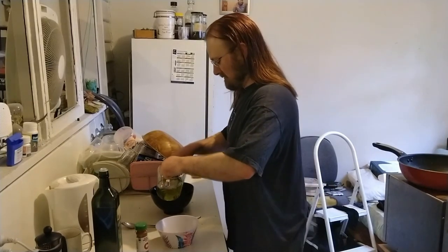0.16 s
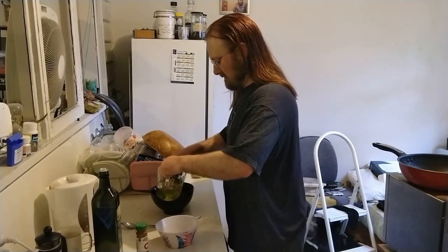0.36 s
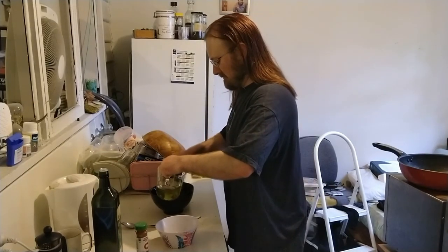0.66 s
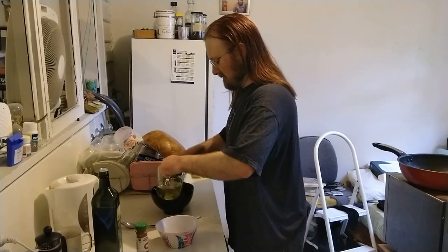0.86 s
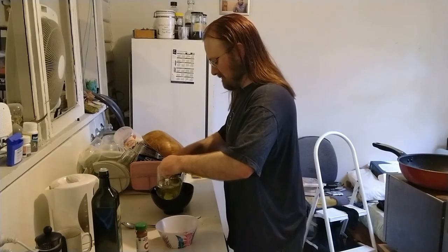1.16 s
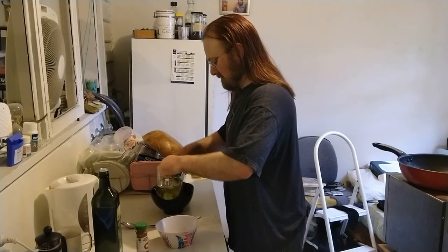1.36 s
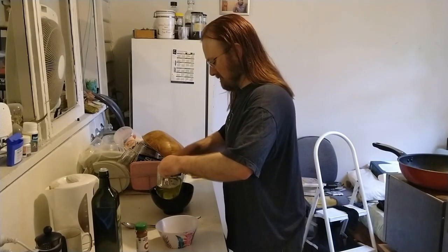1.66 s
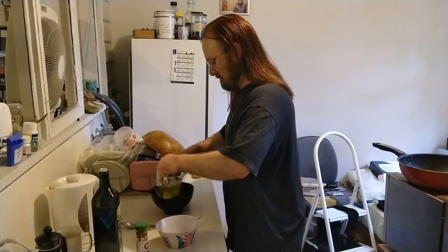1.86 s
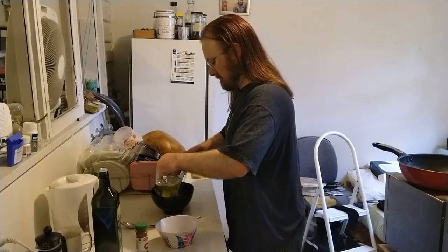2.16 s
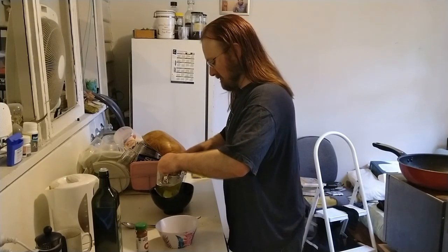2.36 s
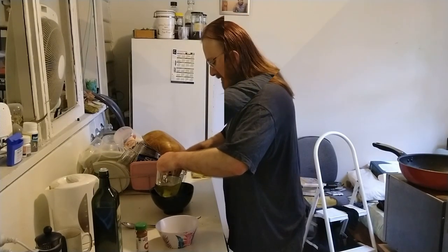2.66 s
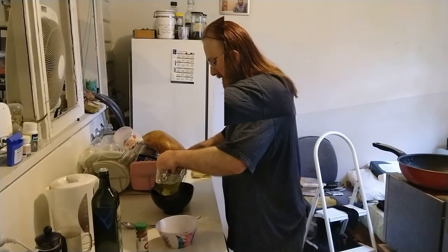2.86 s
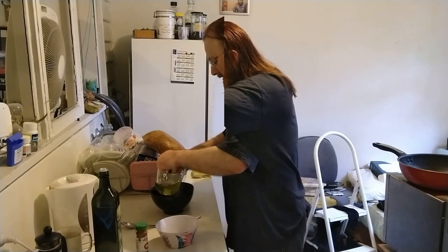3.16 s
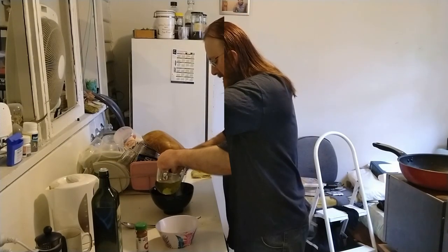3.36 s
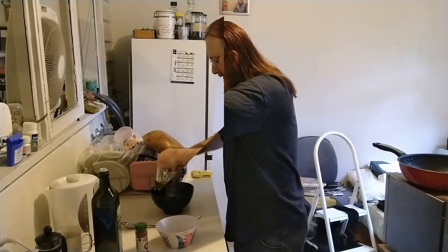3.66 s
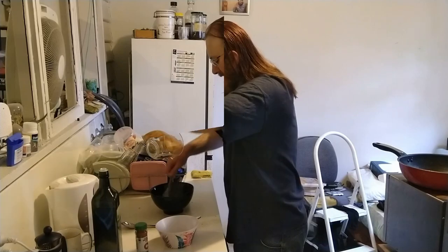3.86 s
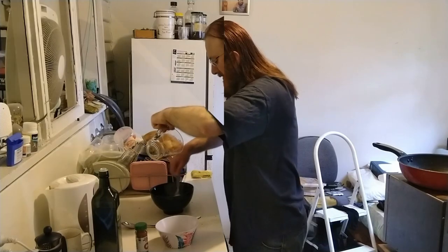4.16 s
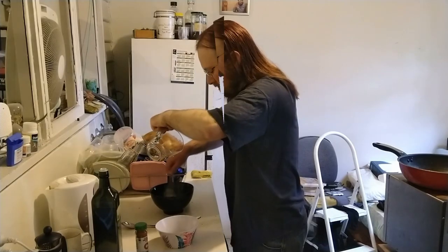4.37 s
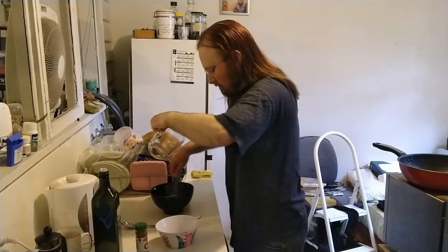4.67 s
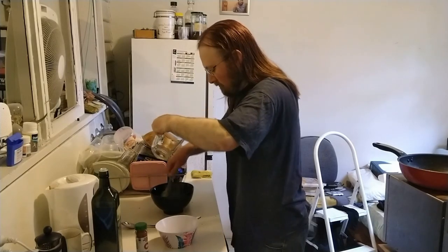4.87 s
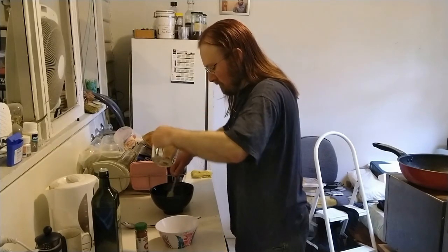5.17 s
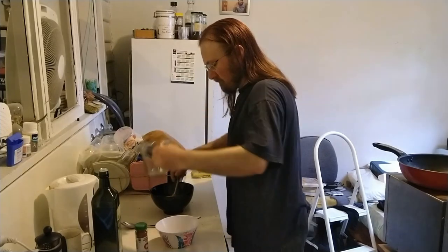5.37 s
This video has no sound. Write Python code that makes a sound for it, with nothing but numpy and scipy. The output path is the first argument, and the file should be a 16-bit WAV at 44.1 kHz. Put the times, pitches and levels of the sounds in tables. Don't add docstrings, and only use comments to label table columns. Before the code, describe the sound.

Metal utensil beats food in a glass jug, about six bright clattering knocks a second with counter thumps, slower after a cut, over engine hum.

```python
import sys
import numpy as np
from scipy import signal
from scipy.io import wavfile
from scipy.ndimage import uniform_filter1d

SR = 44100
rng = np.random.default_rng(int(sys.argv[2]) if len(sys.argv) > 2 else 0)


def wav_record(signal):
    frames = np.transpose(np.atleast_2d(signal))
    bounded = np.clip(frames, -1, 1)
    quanta = np.round(bounded * 32767).astype(np.int16)
    wavfile.write(sys.argv[1], SR, quanta)


def undo_db(level):
    steps = np.asarray(level, float) / 20
    return 10 ** steps


N = 243431
SCENE_CHANGE_S = 3.4436
GRIP_UNTIL_S, GRIP_RING_DB, GRIP_COUNTER_DB = 0.93, -49, -7


def evened(x):
    return x / np.sqrt(np.mean(x ** 2) + 1e-20)


def read(points, hz):
    f, value = np.transpose(points)
    return np.interp(np.log(hz + 1), np.log(f + 1), value)


def add(mix, s, sound):
    part = mix[round(s * SR):][:len(sound)]
    part += sound[:len(part)]


def gritty(size):
    spikes_db = 5. * np.minimum(rng.exponential(1, size), 4)
    return evened(rng.standard_normal(size) * undo_db(spikes_db))


# [freq_hz, likeness]
LIKENESS = [(200, 0.53), (400, 0.98), (600, 0.022), (6000, 0.033), (9000, 0.2)]


def noise(colour, size, patchy_db):
    hop, hz = size // 4, np.fft.rfftfreq(size, 1 / SR)
    a, b, c, d, patches = rng.standard_normal((N // hop + 5, len(hz), 5)).T
    patches = uniform_filter1d(patches, size=12, axis=0)
    patches = evened(uniform_filter1d(patches, size=10, axis=1, mode="wrap"))
    same = np.clip(read(LIKENESS, hz), -1, 1)[:, None]
    left = a + 1j * b
    right = same * left + np.sqrt(1 - same ** 2) * (c + 1j * d)
    z = np.array([left, right]) * undo_db(read(colour, hz)[:, None] + patchy_db * patches)
    return evened(signal.istft(z, nperseg=size, noverlap=size - hop)[1][:, :N])


def beating():
    linger_s, after_change_db = 0.13, -2
    s, _, db, _ = np.transpose(KNOCKS)
    at = np.arange(0, N, 256)
    since = at / SR - s[:, None]
    power = undo_db(db + after_change_db * (s > SCENE_CHANGE_S))[:, None] ** 2
    power = power * np.exp(-(since / linger_s) ** 2) * (since > 0)
    strength = np.sqrt(uniform_filter1d(power.sum(0), size=12) / 2)
    return np.interp(np.arange(N), at, strength)


# [freq_hz, level_db]
AIR_COLOUR = [(120, -44), (200, -9.5), (430, -8), (1100, -8.5), (1730, -16), (2400, -17.5), (3500, -20),
              (6000, -25), (7800, -31), (9300, -63), (11000, -38), (14500, -44), (16500, -68)]


def air():
    return undo_db(-58.5) * noise(AIR_COLOUR, size=1024, patchy_db=3.5)


# [freq_hz, level_db]
WASH_COLOUR = [(250, -19), (400, 3), (600, -3.5), (900, -9.5), (1500, -7), (2200, -53)]


def wash():
    quiet_db, of_thump_db = -59, -23
    passing_s, passing_half_s, passing_db = 2.74, 0.23, -51
    passing = undo_db(passing_db) * np.exp(-((np.arange(N) / SR - passing_s) / passing_half_s) ** 2)
    swell = undo_db(-8.5) * (undo_db(quiet_db) + undo_db(of_thump_db) * beating() + passing)
    return swell * noise(WASH_COLOUR, size=512, patchy_db=4.5)


# [freq_hz, level_db]
MURMUR_COLOUR = [(60, -10), (100, 11), (150, 2.5), (220, 1), (330, -15), (500, -36.5)]


def murmur():
    quiet_db, of_thump_db = -55, -17.5
    level = undo_db(quiet_db) + undo_db(of_thump_db) * beating()
    return level * noise(MURMUR_COLOUR, size=2048, patchy_db=5.5)[0]


# [loudest_s, half_length_s, pitch_hz, level_db]
DRONE = [(0.03, .12, 52, -52), (1.644, 0.12, 50, -50), (2.504, .1, 50, -45), (3.306, .07, 52, -40),
         (3.586, 0.15, 45, -33.5), (3.876, 0.38, 44.5, -37.5), (4.607, 0.35, 46, -42.5),
         (5.084, 0.14, 46.5, -34.5), (5.396, 0.12, 50, -37), (4.06, 0.33, 69, -43),
         (4.252, 0.054, 68, -32.5), (4.44, 0.14, 68, -35.5), (4.72, 0.1, 69, -37), (5.236, 0.12, 63, -41),
         (5.428, 0.23, 137, -49.5)]
# [freq_hz, level_db]
RUMBLE_COLOUR = [(20, -29), (40, -3.5), (65, 5), (90, -10), (120, -49), (300, -76)]


def drone():
    waver_hz, rumble_db, rumble_of_drone_db = 0.8, -53.5, -11
    t = np.arange(N) / SR
    s, half, hz, db = np.transpose(DRONE)[:, :, None]
    swells = undo_db(db) * np.exp(-((t - s) / half) ** 2)
    rate, phase, start = rng.random((len(DRONE), 3)).T[:, :, None]
    per_s = 1 + 2 * rate
    waver = waver_hz / (2 * np.pi * per_s) * np.sin(2 * np.pi * (per_s * t + phase))
    turns = hz * t + waver + start
    notes = np.sqrt(2) * (swells * np.sin(2 * np.pi * turns)).sum(0)
    rumble = undo_db(rumble_db) + undo_db(rumble_of_drone_db) * np.linalg.norm(swells, axis=0)
    return notes + rumble * noise(RUMBLE_COLOUR, size=4096, patchy_db=-0.5)[0]


# [left_s, right_s, left_gain, right_gain]
ECHOES = [(0, .00004, .85, .9), (.001, .0009, .6, .45), (.002, .0023, .5, -.5), (.0033, .00335, 1.3, 1.35),
          (.0036, .0038, .3, -.6), (.0043, .0045, .8, .6), (.0105, .011, -.4, .35), (.0135, .013, .5, .45),
          (.02, .021, .35, -.35)]
# [freq_hz, t60_s], a negative time swells
TAIL_T60 = [(500, -2.5), (1600, 0.64), (2200, 0.31), (2800, 0.33), (4000, 0.23), (7000, 0.3),
            (12000, 0.2255)]
# [freq_hz, level_db]
TAIL_DB = [(1500, 0), (2100, -1), (2800, 6.5), (7000, 6), (12000, 3.5)]


def kitchen():
    taps = np.zeros((2, SR // 2))
    slots = np.arange(240, SR // 2 - 16, 16)
    at = slots + rng.integers(0, 16, (2, len(slots)))
    np.put_along_axis(taps, at, rng.choice([-1., 1.], at.shape), 1)
    taps[1] = .5 * taps[0] + .87 * taps[1]
    hz, t, z = signal.stft(taps, SR, nperseg=128)
    decay = undo_db(-60 * t / read(TAIL_T60, hz)[:, None])
    decay *= undo_db(read(TAIL_DB, hz)[:, None]) / np.linalg.norm(decay, axis=1, keepdims=True)
    tail = signal.istft(z * decay, SR, nperseg=128)[1] / 2
    for left_s, right_s, left, right in ECHOES:
        tail[[0, 1], [round(left_s * SR), round(right_s * SR)]] += left, right
    return tail


# [pitch_hz, level_db, t60_s, first_swing]
COUNTER = [(48.4, -21.9, 0.208, -1), (68.0, -32.0, 0.6, 1), (87.5, -22.7, 0.416, -1),
           (104.5, -6.9, 0.183, 1), (132.0, -6.4, 0.151, 1), (141.9, -2.0, 0.213, -1),
           (160.5, -4.7, 0.22, 1), (192.2, 0.0, 0.05, -1), (213.8, -4.3, 0.05, 1),
           (253.2, -20.6, 0.119, -1), (281.5, -26.6, 0.241, -1), (314.7, -15.4, 0.219, -1),
           (383.5, -29.0, 0.207, 1), (424.4, -45.2, 0.6, -1)]
# [pitch_hz, level_db, t60_s, first_swing]
SHELF = [(193, -31, 0.92, -0.92), (248.7, -20, 0.37, 0.64), (310, -27, 0.66, -0.2), (419, -25, 0.52, 0.5),
         (552, -43, 0.71, -1.24), (222.3, -52, 0.33, -0.86)]


def thump(db, upper_db):
    hz, mode_db, t60, direction = np.transpose(COUNTER + SHELF)[:, :, None]
    t = np.arange(12000) / SR
    detune, strength = rng.standard_normal((2, *hz.shape))
    level_db = mode_db + upper_db * (hz > 240) + 1.09 * strength - 60 * t / t60
    swing = np.sin(2 * np.pi * hz * (1 + 0.012 * detune) * t)
    return undo_db(db + 5.5) * (direction * undo_db(level_db) * swing).sum(0)


def touch(db, hz, rings):
    t = np.arange(1600) / SR
    wet, fine = rng.standard_normal((2, len(t) + 1))
    splash = 1.3 * uniform_filter1d(wet, size=20)[1:] * np.sin(2 * np.pi * hz * t)
    spray = 0.57 * np.diff(fine)
    slap = (splash + spray) * np.exp(-t / 0.019) * np.minimum(t / 0.0024, 1)
    ring = np.sin(2 * np.pi * hz * t * (1 + 4.3 * t))
    ring *= np.exp(-t / 0.0039) * np.minimum(t / 0.00051, 1)
    rings = np.clip(rings, 0, 1)
    return undo_db(db + 5) * (0.22 * (1 - rings) * slap + rings * ring)


# [start_s, level_db, pitch_hz, ringing_share]
TOUCHES = [(0.1226, -56, 1310, 0.1), (0.1505, -35.5, 2480, 0.26), (0.2423, -38.5, 1960, 0.18),
           (0.3494, -40.5, 3820, 0.3), (0.392, -35.5, 1460, 0.27), (0.418, -45.5, 3170, 0.57),
           (0.45, -40.5, 3410, 0), (0.5248, -32.5, 2910, 0.3), (0.712, -37, 3040, 0.72),
           (0.741, -31, 4660, 0.63), (0.7693, -26.5, 3830, 0.6), (0.8689, -39, 2835, 0.77),
           (0.893, -28.5, 4760, 0.2), (0.9262, -32.5, 3870, 0.67), (1.0885, -29.5, 4270, 0.54),
           (1.6098, -32, 2147, 0), (1.7488, -38.5, 2310, 0.44), (1.757, -40, 1480, 0.4),
           (2.83, -40, 1450, 0.4), (2.869, -44, 1450, .3), (3.029, -37, 1410, 0.5), (3.6894, -45, 1860, 1),
           (3.9967, -46, 1910, 0.05), (4.1904, -53, 1450, 0), (4.2674, -31, 3820, 0.92),
           (4.3894, -35.5, 3124, 0.18), (4.6594, -26, 3720, 0.2), (5.443, -38.5, 1400, 0)]


def food(room):
    out = np.zeros(N)
    add(out, .15, touch(-47.0, 750, 1.0))
    for s, *slap in TOUCHES:
        add(out, s, touch(*slap))
    shaded = room * (0.33 + 0.5 * np.exp(-np.arange(room.shape[1]) / SR / 0.0027))
    return signal.oaconvolve(out[None], shaded, axes=1)[:, :N]


def causal(gain):
    log = np.log(np.r_[gain, gain[-2:0:-1]] + 1e-5)
    return np.fft.ifft(np.exp(np.conj(signal.hilbert(log)))).real[:len(gain)]


# [pitch_hz, width_hz, level_db]
GLASS = [(1960, 80.5, -1.5), (2466, 78, -8), (2935, 100, -5.5), (3870, 152, -5.5), (4750, 160, -6),
         (6187, 118, -6.5), (6635, 79, -3.5), (7666, 114, -1.5), (8340, 68, -21), (10650, 250, -6),
         (11840, 500, -10.5), (12750, 107, -0.5), (14350, 350, -3)]
# [freq_hz, level_db]
CLATTER_COLOUR = [(300, -65), (1450, -13.5), (1850, -3), (3000, -15.5), (5500, -15), (8200, -12.5),
                  (9400, -17), (11000, -9.5), (15500, -12), (16500, -40)]


def glass(ring_db, low_db, high_db, scatter_db=0):
    hz = np.fft.rfftfreq(2048, 1 / SR)
    f, width, db = np.transpose(GLASS)[:, :, None]
    stronger, shifted = rng.standard_normal((2, *f.shape))
    off_pitch = 2 * (hz - f - 45 * shifted) / ((1 + f / 14000) * width)
    peaks = undo_db(db + scatter_db * stronger) ** 2 / (1 + off_pitch ** 2)
    power = (peaks.sum(0) + undo_db(-40.0) ** 2) * undo_db(read(CLATTER_COLOUR, hz)) ** 2
    place_db = read([(2150, ring_db + 12.5), (2400, low_db + 8.0), (2800, low_db + 13.5),
                     (5200, low_db + 12.0), (5800, 0.0092), (9000, 0), (10000, high_db + 4.5)], hz)
    response = causal(np.sqrt(power) * undo_db(place_db))
    return response / np.linalg.norm(response)


# [start_s, length_s, hiss_db, slosh_db]
SCRAPE = [
    (0.109, 0.12, -43.5, -61),
    (0.189, 0.19, -42.5, -58),
    (0.307, 0.2, -50, -47.5),
    (0.518, 0.16, -36.5, -44),
    (0.714, 0.12, -31.5, -40.5),
    (0.879, 0.11, -29, -45.5),
    (1.038, 0.14, -33.5, -40.5),
]


def scrape():
    start, length, *levels_db = np.transpose(SCRAPE)[:, :, None]
    done = (np.arange(N) / SR - start) / length
    shape_db = np.interp(done, [0, 0.37, 1], [-12.5, 0, -46], left=-120, right=-120)
    hiss_wall, slosh_wall = glass(-44, -42.5, -8.0), glass(-19, 38, -39.5)
    out = np.zeros(N)
    for db, wall in zip(levels_db, (hiss_wall, slosh_wall)):
        stroke = gritty(N) * undo_db(shape_db + db - 14).sum(0)
        out += signal.fftconvolve(stroke, wall)[:N]
    return out


def clatter(db, ring_db, low_db, high_db):
    t = np.arange(6000) / SR
    ticks = rng.choice([-1., 1.], len(t)) * undo_db(3. * rng.standard_normal(len(t))) * np.exp(-t / .0006)
    ticks[0] = 4.2
    spikes_db = 4. * np.minimum(rng.exponential(1, len(t)), 4)
    grit = evened(rng.standard_normal(len(t)) * undo_db(spikes_db))
    slide = grit * undo_db(-22.5) * np.exp(-(t / 0.048) ** 2) * np.minimum(t / 0.0041, 1)
    out = signal.fftconvolve(ticks, glass(ring_db + 1.5, low_db, high_db + 2.0, scatter_db=0.18))
    out += signal.fftconvolve(slide, glass(ring_db - 7.5, low_db + 0.5, high_db - 1.0, scatter_db=4.0))
    for when, pitch, size in rng.random((6, 3)):
        fleck = touch(low_db - 6.5 - 12 * size, 2600 + 3000 * pitch, 0.37)
        add(out, 0.0068 + 0.048 * when, fleck)
    return undo_db(db + 0.5) * out


# [start_s, clatter_db, thump_db, low_glass_db]
KNOCKS = [(0.5234, -31.5, -34.5, -14), (0.7133, -32, -29.5, -16), (0.868, -54, -32, 8),
          (1.0272, -27, -28.5, -15.5), (1.186, -25.5, -29.5, -19), (1.3418, -21, -27.5, -17),
          (1.4864, -22, -26, -16.5), (1.6365, -19.5, -25.5, -17.5), (1.7898, -21, -27, -17),
          (1.9399, -23.5, -27, -14), (2.0949, -23, -28, -13.5), (2.2361, -24, -27.5, -15),
          (2.383, -20, -25.5, -17.5), (2.5355, -20.5, -27, -17), (2.688, -19, -22, -13),
          (2.8466, -21.5, -27.5, -15.5), (2.9954, -22, -28.5, -16), (3.1413, -22.5, -31, -19),
          (3.29, -20, -27, -16), (3.4362, -19.5, -26, -13.5), (3.4903, -25, -36.5, -15),
          (3.6546, -22, -30.5, -10.5), (3.844, -24.5, -33.5, -10.5), (4.0262, -22.5, -30, -13),
          (4.23, -23, -28.5, -12), (4.4188, -20, -28, -11.5), (4.6162, -21.5, -26.5, -10),
          (4.8388, -24, -29, -6), (5.051, -24.5, -32, -8.5)]


def knocks():
    jug, counter = np.zeros((2, 2, N)), np.zeros((2, N))
    add(counter[0], .135, thump(-42.5, GRIP_COUNTER_DB))
    for s, db, thump_db, low_db in KNOCKS:
        part, gripped = int(s > SCENE_CHANGE_S), s < GRIP_UNTIL_S
        ring_db = -16 - 0.33 * (db + 25) + GRIP_RING_DB * gripped
        struck = clatter(db, ring_db, low_db, high_db=-7)
        heard = signal.fftconvolve(struck[None], kitchen(), axes=1)
        add(jug[part].T, s, heard.T)
        add(counter[part], s + 0.00062, thump(thump_db, GRIP_COUNTER_DB * gripped))
    return jug + counter[:, None]


def scene():
    room = kitchen()
    before, after = knocks()
    before += signal.oaconvolve(scrape()[None], room, axes=1)[:, :N]
    since = np.arange(N) / SR - SCENE_CHANGE_S
    smear = 0.17 * np.exp(-np.maximum(since, 0) / 0.012)
    kept = np.where(since < 0, 1, smear)
    background = air() + wash() + murmur() + drone()
    return kept * before + after + food(room) + background


def low_pass(x):
    return signal.sosfilt(signal.butter(12, 16800, fs=SR, output="sos"), x)


def record(dry):
    limited = signal.oaconvolve(dry, signal.firwin(255, 15900, fs=SR)[None], "same")
    return low_pass(limited)


dry = scene()
out = record(dry)
wav_record(out)
```